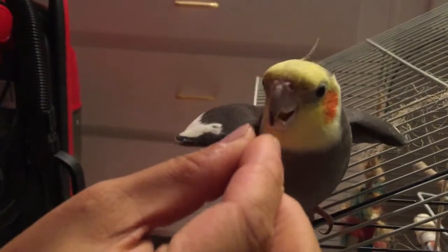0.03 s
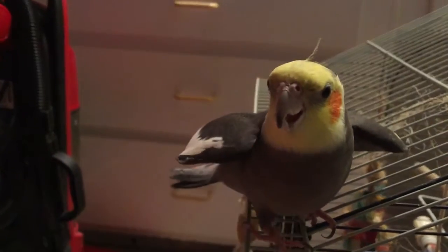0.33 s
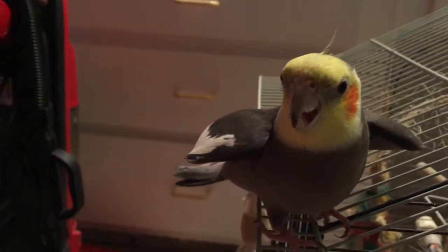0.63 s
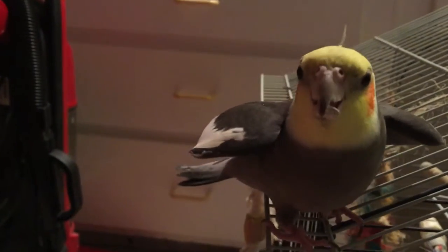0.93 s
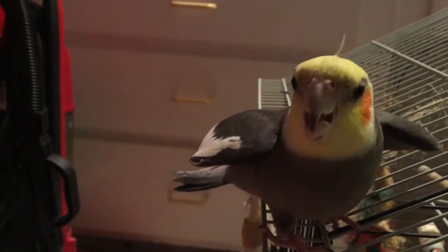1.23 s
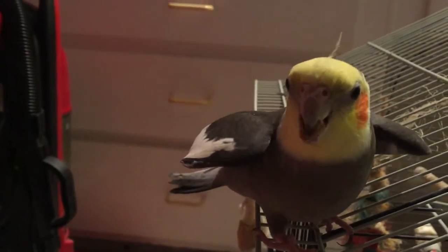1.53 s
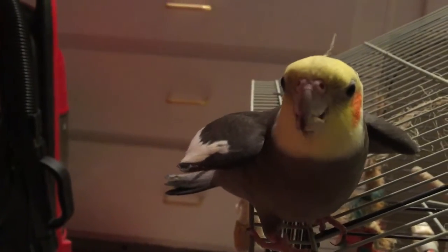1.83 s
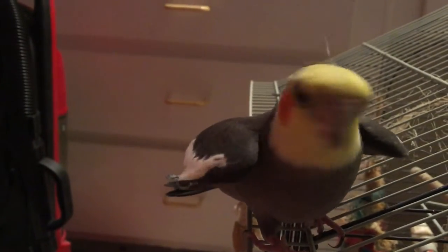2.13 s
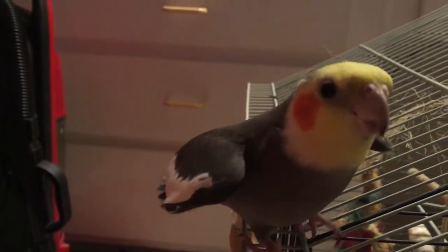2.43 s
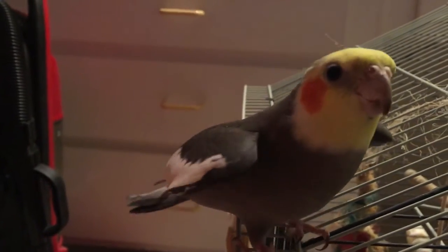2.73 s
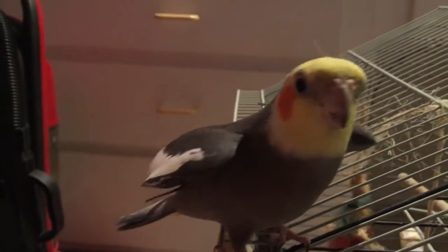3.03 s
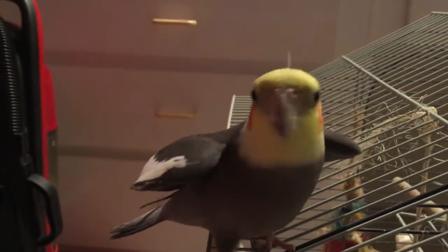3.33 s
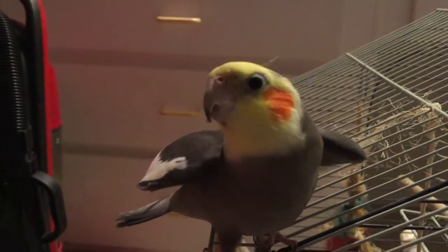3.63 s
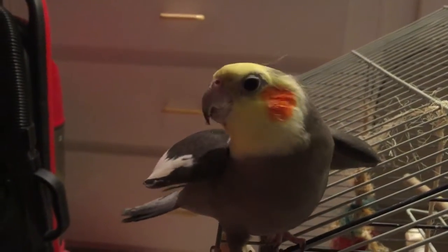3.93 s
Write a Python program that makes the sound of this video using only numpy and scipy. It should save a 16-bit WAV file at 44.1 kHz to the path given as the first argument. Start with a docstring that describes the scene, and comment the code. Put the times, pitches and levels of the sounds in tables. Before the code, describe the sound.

Short, raspy squawks come one after another from a cockatiel begging up close indoors. Its beak first ticks softly on seeds, then cracks them more sharply between the wavering calls, over a very low room hum.

```python
"""A cockatiel, close up in a quiet room, gives nine harsh begging squawks and a small peep.
Its syrinx sings a gliding tone that splits into halves or thirds of its pitch and breaks into rasp,
mostly as a call ends. Around the calls the beak clicks on seeds and the bird hisses softly.
The small room adds a short tail; a mains hum and low room noise lie behind."""
import sys
import numpy as np
from scipy import signal
from scipy.fft import rfft, irfft
from scipy.io import wavfile
from scipy.ndimage import uniform_filter1d, map_coordinates

SR = 44100
rng = np.random.default_rng(int(sys.argv[2]) if len(sys.argv) > 2 else 0)


def wrap_up_sound(samples):
    """Save the sound to the file named by the first command line argument, as 16-bit audio."""
    columns = np.atleast_2d(samples).T
    # keep every value between -1 and 1, then stretch to whole-number steps
    tamed = np.clip(columns, -1, 1)
    steps = np.round(tamed * 32767).astype(np.int16)
    wavfile.write(sys.argv[1], SR, steps)


N = 176400

# The calls: (base treble [dB re fundamental], tilt above 8 kHz [dB/octave], mouth resonance [Hz],
# mouth boost [dB], course); course: (time [s], pitch [Hz], base level [dB], base overtones [dB re level])
CALLS = [ (-22.5, -13, 3406, 8.8, [(.956, 1670, -25.5, -23), (.975, 1446, -23, -21), (.997, 1416, -26, -21),
         (1.049, 1736, -26, -24), (1.087, 1478, -26.5, -20), (1.117, 1430, -25.5, -16.5),
         (1.175, 1634, -25, -5.5), (1.219, 1753, -23.5, -15.5), (1.253, 1675, -32, -12)]),
         (-31, 3, 4320, 12, [(1.426, 1561, -27.5, -4), (1.437, 1437, -28, -12), (1.47, 1467, -25, -19.5),
         (1.491, 1645, -32.5, -14), (1.5, 1870, -29.5, -34), (1.523, 1964, -33, -35),
         (1.555, 1834, -23, -16.5), (1.572, 1798, -23.5, 2.5), (1.585, 1705, -19.5, -9.5),
         (1.602, 2150, -23.5, -10)]), (-30.5, 2, 5480, 20.5, [(1.774, 1898, -34.5, -30),
         (1.81, 1822, -23, -35), (1.838, 1773, -18, -28), (1.858, 2008, -25.5, -15.5),
         (1.87, 2042, -15, -12.5), (1.889, 1905, -28.5, -11)]), (-29, 3, 4500, 8, [(2.056, 1670, -35.5, -4),
         (2.08, 1424, -27, -21), (2.125, 1566, -26.5, -21), (2.155, 1664, -28, -18),
         (2.189, 1857, -21, -24.5), (2.223, 1600, -24, -2.5), (2.251, 1450, -35.5, 7)]),
         (-33, -1, 4800, 2.5, [(2.323, 1304, -36.5, -21.5), (2.377, 1394, -27, -23),
         (2.46, 1364, -27.5, -34), (2.5, 1532, -25.5, -25), (2.529, 1657, -20.5, -18.5),
         (2.541, 1612, -21.5, -17), (2.552, 1500, -28.5, -10), (2.561, 1910, -22.5, -25)]),
         (-33.5, 6.5, 4880, 6.5, [(2.708, 1463, -32, -24), (2.724, 1382, -28.5, -27),
         (2.74, 1295, -30.5, -34), (2.749, 1565, -40, -14), (2.792, 1829, -26, -61),
         (2.833, 1510, -22, -13.5), (2.847, 1480, -23.5, -1.5), (2.888, 1621, -17.5, -12),
         (2.916, 1650, -20.5, -15), (2.929, 1421, -31.5, 1), (2.941, 1474, -30, -22)]),
         (-31.5, 12.5, 7100, 2.6, [(3.032, 1354, -36.5, -18), (3.057, 1382, -29, -22.5),
         (3.113, 1568, -26, -23), (3.147, 1442, -26, -21.5), (3.173, 1416, -29.5, -16),
         (3.205, 1977, -29.5, -14), (3.235, 2121, -30, -14), (3.26, 2128, -27.5, -22),
         (3.272, 1695, -30.5, -2), (3.297, 1602, -27, -23)]),
         (-25, 12, 2960, 8.9, [(3.413, 1505, -30, -11.5), (3.422, 1384, -47.5, -24),
         (3.435, 1374, -34, -15)]), (-27.5, 12, 5420, 7.3, [(3.474, 1876, -30, -72),
         (3.492, 1895, -31, -74), (3.522, 1508, -21.5, -40), (3.561, 1560, -23, -13.5),
         (3.569, 1760, -16, -1.5), (3.59, 1760, -14.5, -17), (3.613, 1586, -25.5, 1),
         (3.636, 1370, -35.5, 8)]), (-35, 24, 1400, 33, [(3.751, 1524, -40, -36.5), (3.765, 1366, -31, -21),
         (3.803, 1451, -26, -19.5), (3.868, 1395, -24.5, -23.5), (3.905, 1510, -26.5, -23),
         (3.938, 1677, -22.5, -19.5), (3.954, 1622, -23, -23.5), (3.968, 1274, -44, -19)])]
# The syrinx repeats only every 2nd or 3rd cycle: (start [s], end [s], cycles [count], side-tone gain [dB])
SPLITS = [(0.993, 1.081, 2, -8.5), (1.142, 1.23, 2, -10.5), (1.446, 1.49, 2, -18), (1.478, 1.524, 3, -7),
          (2.106, 2.143, 2, -19), (2.317, 2.511, 2, -9.5), (2.536, 2.556, 2, -8), (2.716, 2.751, 2, -9.5),
          (2.781, 2.803, 3, -14), (2.808, 2.823, 2, -13.5), (3.048, 3.129, 2, -11), (3.19, 3.256, 2, -8),
          (3.477, 3.49, 2, -9), (3.49, 3.509, 3, -8.5), (3.506, 3.523, 2, -14.5), (3.745, 3.825, 2, -14)]
# The tone breaks up: (start [s], end [s], rasp [0-1])
RASPS = [(0.991, 1.071, 0.08), (1.167, 1.225, 0.06), (1.235, 1.246, 0.74), (1.483, 1.527, 0.37),
         (1.487, 1.508, .45), (2.058, 2.075, 0.54), (2.222, 2.251, 0.58), (2.469, 2.492, 0.3),
         (2.546, 2.562, 0.22), (2.728, 2.812, 0.15), (2.914, 2.933, 0.37), (3.191, 3.201, 0.53),
         (3.259, 3.295, 0.82), (3.613, 3.634, 0.45), (3.953, 3.957, 0.6)]
# Throat colour on the overtones: (frequency [Hz], gain [dB])
THROAT_EQ = [(2600, 2.5), (3400, 5), (4300, -7), (5300, -14.5), (6300, -13.5), (7400, -5), (8600, 1.5),
             (10000, -24.5), (11500, -0.5), (12700, 2.5), (14000, -11), (15500, -17)]
# Colour of the lower side tones: (frequency [Hz], gain [dB])
SIDE_TONE_EQ = [(550, -13), (750, -16), (1100, -6.5), (2100, -5.5), (2600, -2.5), (3500, -21), (4500, -21),
                (6500, -43)]
# Seed cracks: (time [s], peak level [dB], tilt [dB/octave])
CLICKS = [(0.19, -37, 8.5), (0.197, -41, 10), (0.227, -39, 10), (0.2458, -30, 12), (.546, -44, 10),
          (0.552, -41.5, 10), (.702, -46.5, -4), (.886, -42, 8), (1.28, -48, -3), (1.331, -38.5, 7),
          (1.44, -21, 5.5), (1.572, -14, 9), (1.973, -37.5, -1), (1.977, -32, 1.5), (2.057, -19, -7),
          (2.062, -24.5, -4.5), (2.095, -24, -5.5), (2.136, -38, 1), (2.147, -18.5, -4.5),
          (2.364, -27.5, -6), (2.4767, -11, -6)]
# Beak colour: (frequency [Hz], gain [dB])
BEAK_EQ = [(100, -58), (600, -20), (1500, -2), (2800, 5), (4300, 4), (5600, -0.5), (7500, 1.5), (10000, -8),
           (12800, -0.5), (15500, -16.5)]
# Soft hisses: (start [s], length [s], centre [Hz], width [octaves], level [dB])
HISSES = [(0.158, 0.026, 8740, 0.57, -60.5), (0.363, 0.061, 5000, 0.28, -63),
          (0.554, 0.076, 4830, 0.49, -58.5), (0.575, 0.033, 9800, 0.88, -61.5),
          (0.787, .115, 3430, 0.46, -52.5), (1.679, 0.1, 4750, 0.43, -59.5),
          (2.037, 0.238, 4450, 0.61, -50), (3.783, 0.036, 7960, 0.56, -59), (3.133, 0.049, 5470, 0.24, -63),
          (3.451, 0.19, 4860, 0.39, -51.5)]
# Colour of the room's tail: (frequency [Hz], gain [dB])
ROOM_EQ = [(700, 1), (1700, 2.5), (6000, -3)]
# The room's opening ring: (centre [Hz], width [octaves], level [dB])
OPENING_RING, RING_DECAY_S = [(1990, 0.12, -42), (3700, 0.091, -55.5)], 0.034
# Faint tones above the hum: (frequency [Hz], level [dB])
HUM_PARTNERS = [(240, -77), (288, -75.5)]
# Colour of the room noise: (frequency [Hz], gain [dB])
FLOOR_EQ = [(25, -28.5), (70, 6), (150, -1.5), (300, -5), (480, -14.5), (1200, -15.5), (2000, -11.5),
            (3200, -17.5), (4700, -24), (14000, -28)]

ATTACK_S, RELEASE_S, SPLIT_FADE_S, RASP_FADE_S = 0.0044, 0.013, 0.0026, 0.011
VOICE_TRIM_DB, OVERTONE_TRIM_DB, AIR_DB = 0.5, -0.5, -12
MOUTH_WIDTH_HZ, WINDPIPE_HZ = 304, 614
JITTER, SHIMMER_DB, UNSTEADY_HZ = 0.0045, 1.01, 140
FLUTTER_DB, FLUTTER_HZ = 4, 26  # each overtone wavers on its own
# In a rasp each cycle comes early or late, strong or weak, and the pitch wanders.
SLIP_RAD, SCATTER_DB, WANDER, WANDER_HZ = 0.64, 3, 0.12, 450
RASP_OVERTONES_DB, RASP_TRIM_DB = -13, -2
HUSKINESS = 0.035  # unevenness left in the clear tone
# The treble rises with the overtones and with the pitch.
TREBLE_DB_PER_DB, USUAL_OVERTONES_DB = 0.34, -20.5
TREBLE_DB_PER_OCTAVE, USUAL_HZ = 13.5, 1646


def squawks(t):
    """The unsteady voice creaks where the syrinx turns chaotic; the short windpipe passes no bass."""
    rasp = sum(share * gate(t, start, end, RASP_FADE_S, RASP_FADE_S) for start, end, share in RASPS)
    rasp = np.clip(rasp, 0, 1)
    wobble = JITTER * drift(UNSTEADY_HZ) + WANDER * rasp * drift(WANDER_HZ)
    shimmer = undb(VOICE_TRIM_DB + SHIMMER_DB * drift(UNSTEADY_HZ))
    flutter = undb(FLUTTER_DB * np.array([drift(FLUTTER_HZ) for _ in range(11)]))
    air = unit(low_cut(coloured_noise(THROAT_EQ), hz=6500))
    voice = np.zeros(N)
    for call in CALLS:
        course = call[-1]
        on = (t > course[0][0] - ATTACK_S) & (t < course[-1][0] + RELEASE_S)
        voice[on] += syrinx(t[on], call, wobble[on], rasp[on], flutter[:, on], air[on])
    return low_cut(voice * shimmer, WINDPIPE_HZ)


def syrinx(t, call, wobble, rasp, flutter, air):
    """One call: a gliding fundamental, overtones shaped by throat and mouth, turbulence and side tones."""
    treble_db, tilt_db, mouth_hz, mouth_db, course = call
    times, *curves = np.array(course, float).T
    hz, level_db, overtones_db = (uniform_filter1d(np.interp(t, times, curve), size=n, mode="nearest")
                                  for curve, n in zip(curves, (520, 200, 200)))
    treble_db += TREBLE_DB_PER_DB * (overtones_db - USUAL_OVERTONES_DB)
    treble_db += TREBLE_DB_PER_OCTAVE * np.log2(hz / USUAL_HZ)
    overtones_db += rasp * (RASP_OVERTONES_DB - overtones_db)

    cycles = np.cumsum(hz * (1 + wobble)) / SR
    slip, strength = ((rasp + HUSKINESS) * map_coordinates(per_cycle, [cycles], mode="mirror")
                      for per_cycle in rng.standard_normal((2, 1024)))
    phase = 2 * np.pi * cycles + SLIP_RAD * slip

    harmonic = np.arange(len(flutter))[:, None] + 2
    harmonic_hz = harmonic * hz
    mouth = undb((1 - rasp) * mouth_db / (1 + (2 * (harmonic_hz - mouth_hz) / MOUTH_WIDTH_HZ) ** 2))
    colour, high = throat(harmonic_hz, tilt_db), treble_share(harmonic_hz)
    mids, treble = colour * (1 - high), colour * high
    mid_gain = undb(overtones_db + OVERTONE_TRIM_DB) / np.linalg.norm(mids, axis=0)
    treble_gain = undb(treble_db) / np.linalg.norm(treble, axis=0)
    weights = (mid_gain * mids + treble_gain * treble) * mouth * flutter

    tone = np.sin(phase) + (weights * np.sin(harmonic * phase)).sum(0)
    tone += undb(treble_db + AIR_DB) * air * (1 + np.sin(phase)) / 2  # a puff each cycle
    tone += side_tones(t, hz, phase, tilt_db, treble_gain)
    gain = np.sqrt(2) * undb(level_db + SCATTER_DB * strength + RASP_TRIM_DB * rasp)
    return tone * gain * gate(t, times[0], times[-1], ATTACK_S, RELEASE_S)


def side_tones(t, hz, phase, tilt_db, treble_gain):
    """Where the syrinx repeats every 2nd or 3rd cycle, extra tones fill in between the harmonics."""
    out = np.zeros(len(t))
    for start, end, cycles, db in SPLITS:
        if t[0] < (start + end) / 2 < t[-1]:
            ratio = np.array([j / cycles for j in range(1, 10 * cycles) if j % cycles])[:, None]
            side_hz = ratio * hz
            high = treble_share(side_hz)
            weights = gain_at(side_hz, SIDE_TONE_EQ) * (1 - high)
            weights += treble_gain * throat(side_hz, tilt_db) * high
            fade = gate(t, start, end, SPLIT_FADE_S, SPLIT_FADE_S)
            out += undb(db) * fade * (weights * np.sin(ratio * phase)).sum(0)
    return out


def throat(hz, tilt_db):
    """The throat's resonances, with the top end tilted above 8 kHz."""
    tilt = undb(tilt_db * np.log2(np.maximum(hz / 8000, 1)))
    return gain_at(hz, THROAT_EQ) * tilt * (hz < SR / 2)


def beak_clicks(t, decay_s=0.0013):
    """Seed husks crack in the beak: very short bursts, some brighter than others."""
    size, lead = 1024, 128  # samples
    hz = np.fft.rfftfreq(size, 1 / SR)
    out = np.zeros(N + size)
    for when, db, tilt in CLICKS:
        colour = gain_at(hz, [(f, level + tilt * np.log2(f)) for f, level in BEAK_EQ])
        burst = np.roll(rng.standard_normal(size) * np.exp(-t[:size] / decay_s), lead)
        crack = irfft(rfft(burst) * colour)
        at = int(when * SR) - lead
        out[at:at + size] += undb(db) * crack / np.abs(crack).max()
    return out[:N]


def hisses(t, grain_db=1.5):
    """Short grainy hisses that swell quickly and fade."""
    out = np.zeros(N)
    for start, length, hz, octaves, db in HISSES:
        swell = gate(t, start + 0.1 * length, start + 0.9 * length, rise=length / 4, fall=length / 2)
        out += undb(db) * band_noise(hz, octaves) * swell
    return out * undb(grain_db * drift(rate_hz=250))


def room(t, bird, wet_db=-22.5, t60_s=0.22, predelay_s=0.0091):
    """A small furnished room answers the bird; at the start it rings as if from an earlier chirp."""
    age = t[:SR // 2]
    tail = coloured_noise(ROOM_EQ, len(age)) * undb(-60 * age / t60_s) * (age > predelay_s)
    reverb = signal.fftconvolve(bird, tail / np.linalg.norm(tail))[:N]
    ring = sum(undb(db) * band_noise(hz, octaves) for hz, octaves, db in OPENING_RING)
    return undb(wet_db) * reverb + ring * np.exp(-t / RING_DECAY_S)


def mains_hum(t, hum_hz=121.2, hum_db=-62.5, waver_db=2.9):
    """A low mains hum and two faint partners, each wavering in level and phase."""
    hum = np.zeros(N)
    for hz, db in [(hum_hz, hum_db)] + HUM_PARTNERS:
        gain = np.sqrt(2) * undb(db + waver_db * drift(rate_hz=27))
        hum += gain * np.sin(2 * np.pi * hz * t + drift(rate_hz=24) / 4)
    return hum


def coloured_noise(eq, size=N):
    """Noise of rms 1 through an EQ curve."""
    colour = gain_at(np.fft.rfftfreq(size, 1 / SR), eq)
    return unit(irfft(rfft(rng.standard_normal(size)) * colour, size))


def band_noise(hz, octaves, rib_db=3.5, rib_spacing_hz=852):
    """Noise of rms 1 in a bell-shaped band, ribbed by evenly spaced resonances."""
    f = np.fft.rfftfreq(N, 1 / SR)
    bell = np.exp(-(np.log2((f + 1) / hz) / octaves) ** 2 / 2)
    ribs = undb(rib_db * np.cos(2 * np.pi * f / rib_spacing_hz))
    return unit(irfft(rfft(rng.standard_normal(N)) * ribs * bell, N))


def drift(rate_hz):
    """Smooth random modulation of rms 1."""
    rolloff = (1 + (np.fft.rfftfreq(N, 1 / SR) / rate_hz) ** 2) ** 2
    return unit(irfft(rfft(rng.standard_normal(N)) / rolloff, N))


def gate(t, start, end, rise, fall):
    """Smooth fades in and out, centred on start and end."""
    ramp = np.minimum((t - start) / rise, (end - t) / fall) + 0.5
    return np.sin(np.pi / 2 * np.clip(ramp, 0, 1)) ** 2


def treble_share(hz):
    """Crossover from mids (0) to treble (1)."""
    return np.clip((hz - 5700) / 1200, 0, 1)


def low_cut(x, hz):
    """Roll off the bass at 24 dB per octave."""
    return signal.sosfilt(signal.butter(4, hz, "high", fs=SR, output="sos"), x)


def gain_at(hz, eq):
    """Gain of an EQ curve on a log-frequency axis."""
    f, db = np.array(eq, float).T
    return undb(np.interp(np.log(hz + 1e-9), np.log(f), db))


def undb(db):
    """Decibels to gain."""
    return 10 ** (np.asarray(db) / 20)


def unit(x):
    """Scale to rms 1."""
    return x / np.sqrt(np.mean(x ** 2))


def scene():
    """The mono mix: the bird up front, then its room, the hum and a bed of low noise."""
    t = np.arange(N) / SR
    bird = squawks(t) + beak_clicks(t) + hisses(t)
    return (bird + room(t, bird) + mains_hum(t) + undb(-62.5) * coloured_noise(FLOOR_EQ))[None]


def record(dry):
    """A steep high cut at 15.5 kHz."""
    return signal.sosfilt(signal.ellip(10, 0.2, 80, 15500, fs=SR, output="sos"), dry)


dry = scene()
out = record(dry)
wrap_up_sound(out)
```